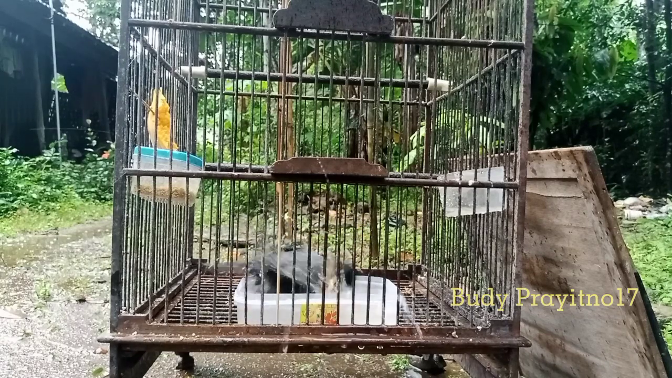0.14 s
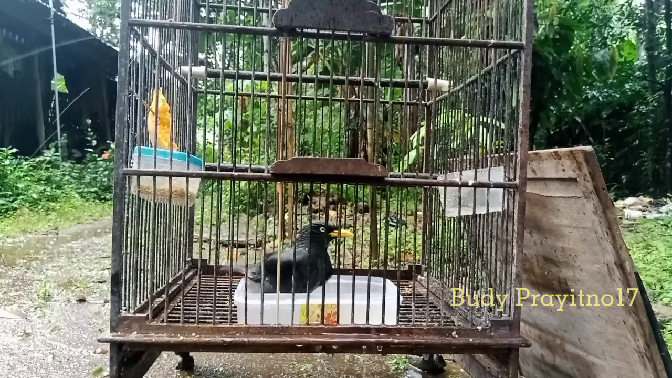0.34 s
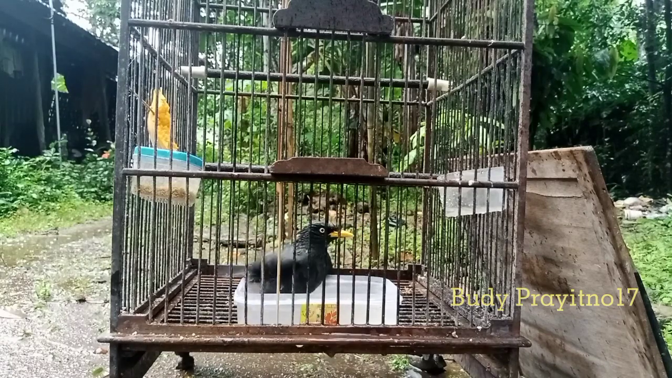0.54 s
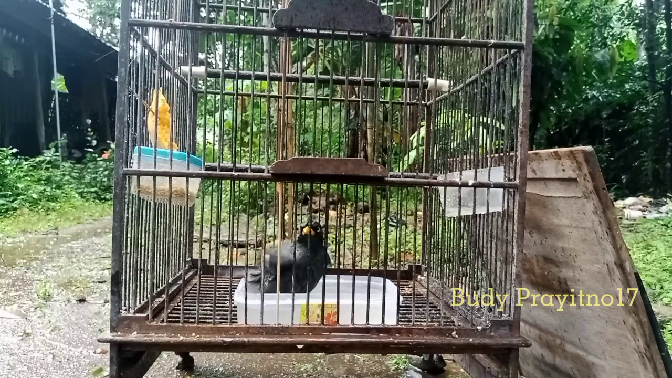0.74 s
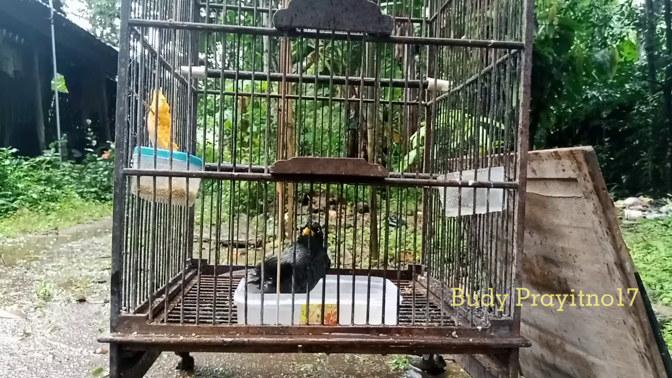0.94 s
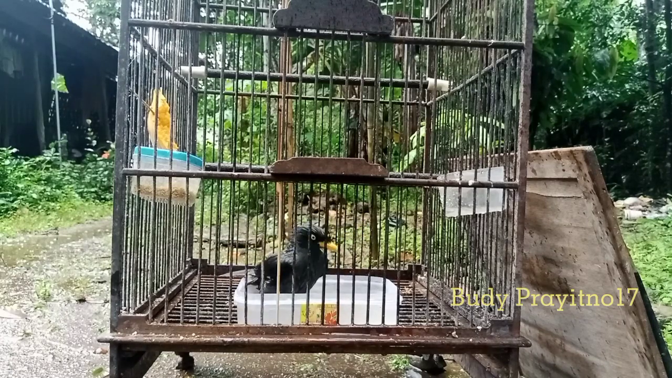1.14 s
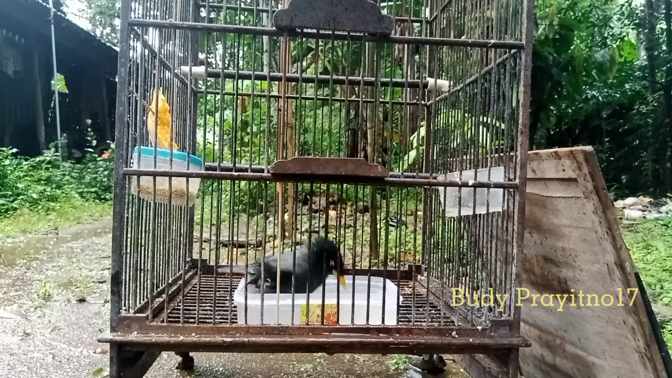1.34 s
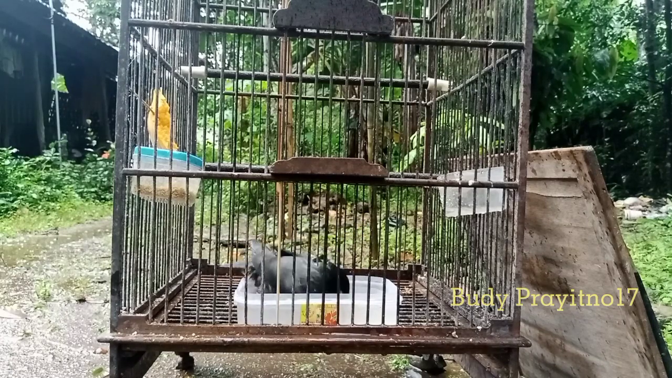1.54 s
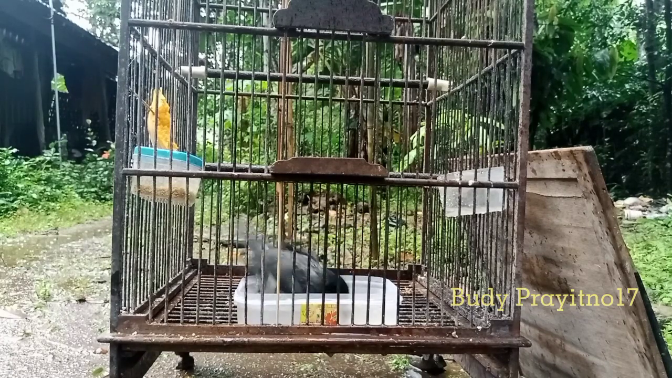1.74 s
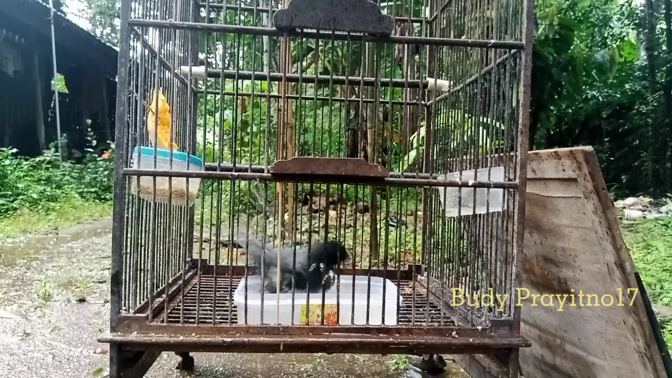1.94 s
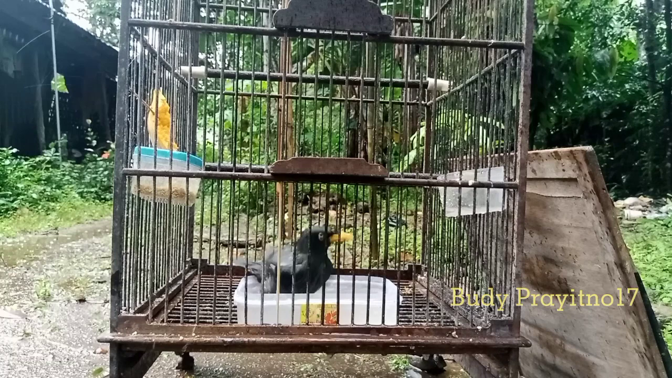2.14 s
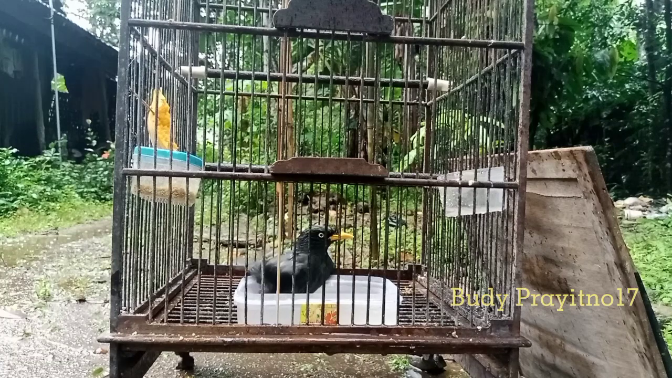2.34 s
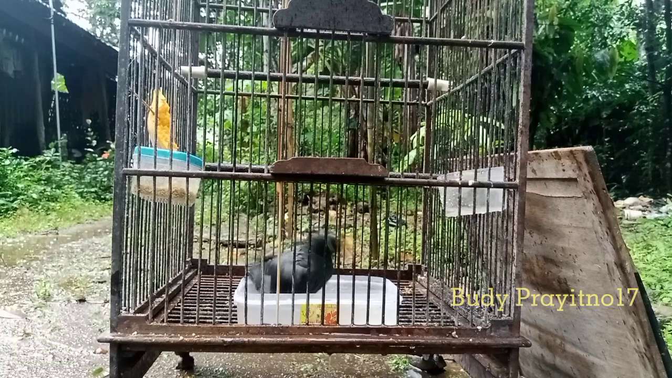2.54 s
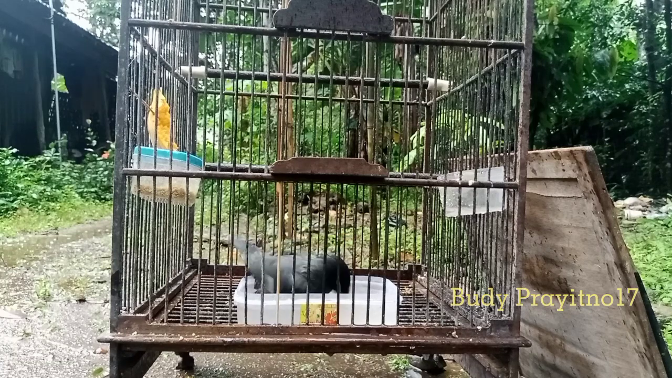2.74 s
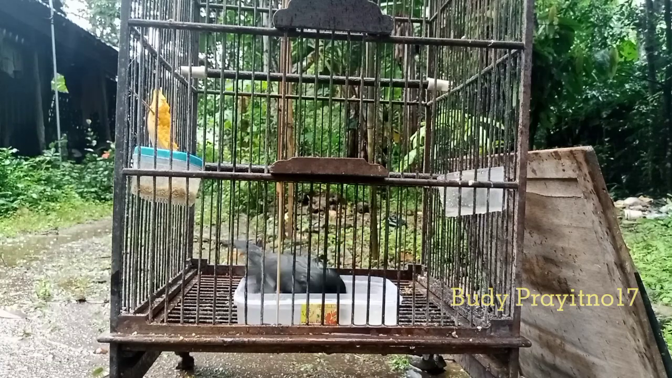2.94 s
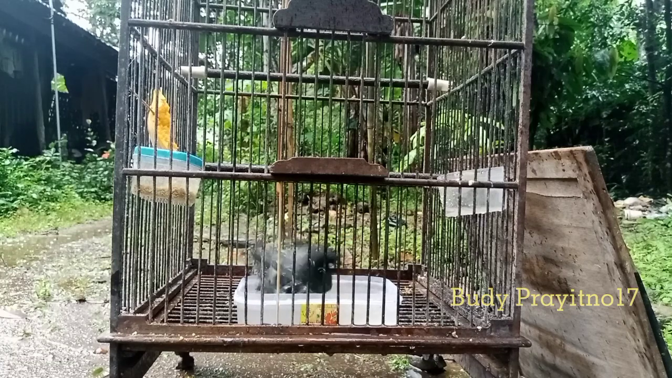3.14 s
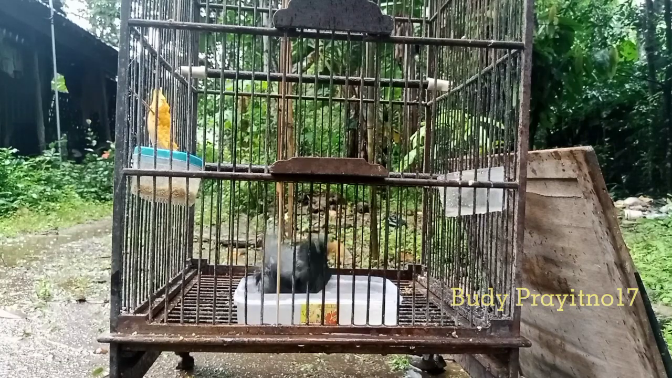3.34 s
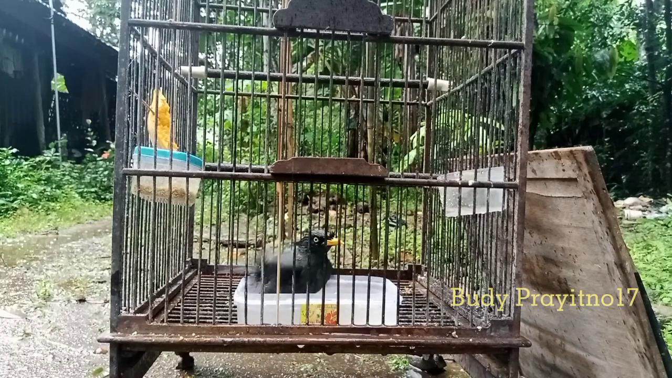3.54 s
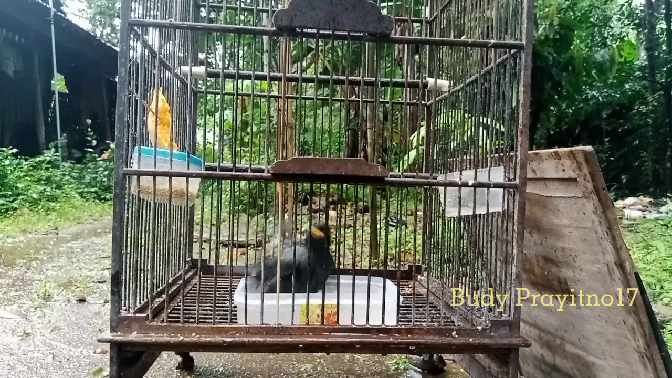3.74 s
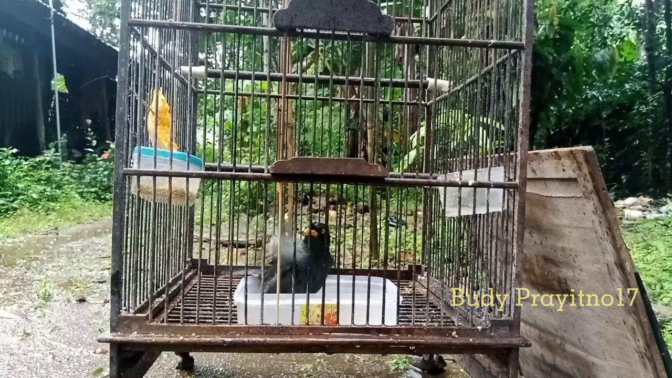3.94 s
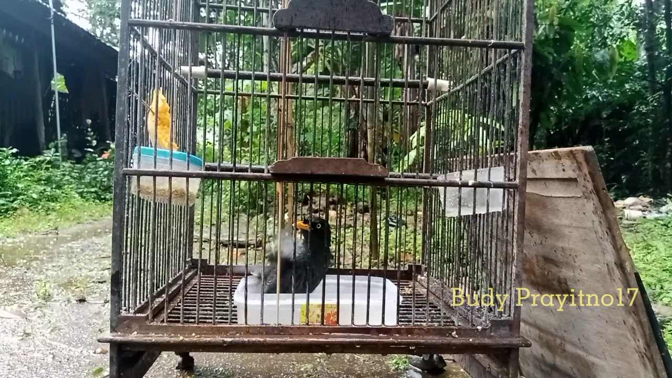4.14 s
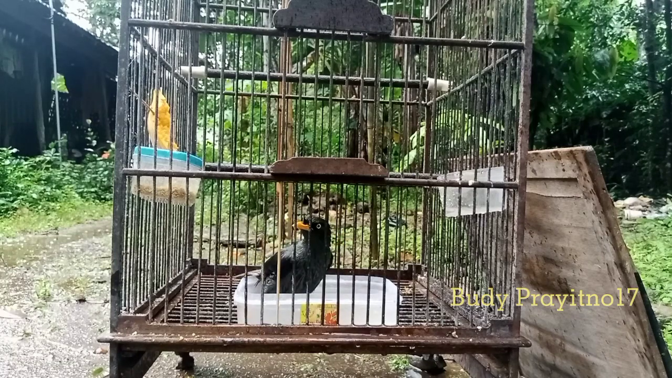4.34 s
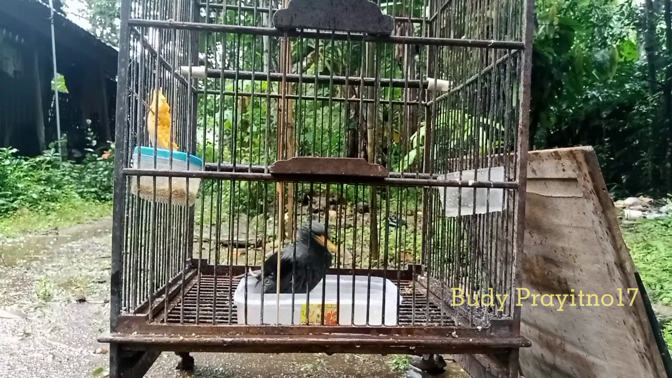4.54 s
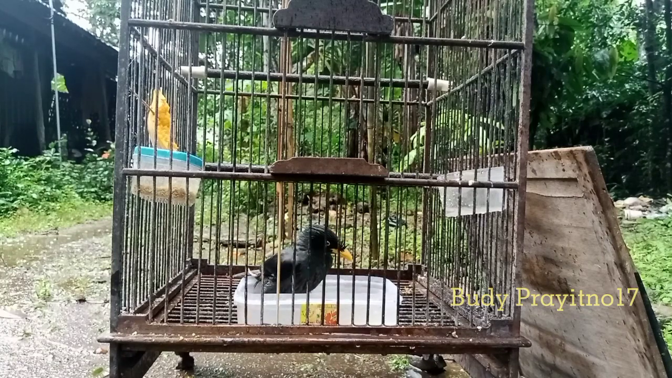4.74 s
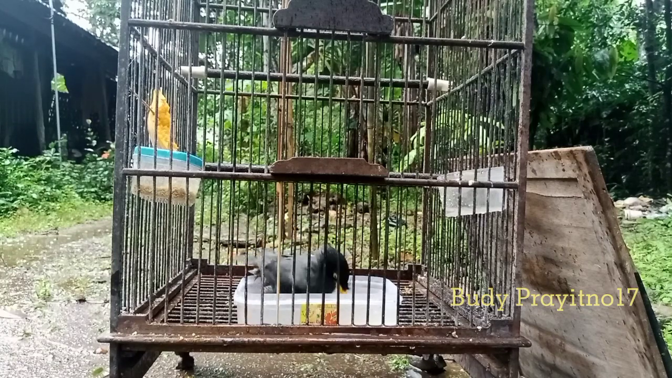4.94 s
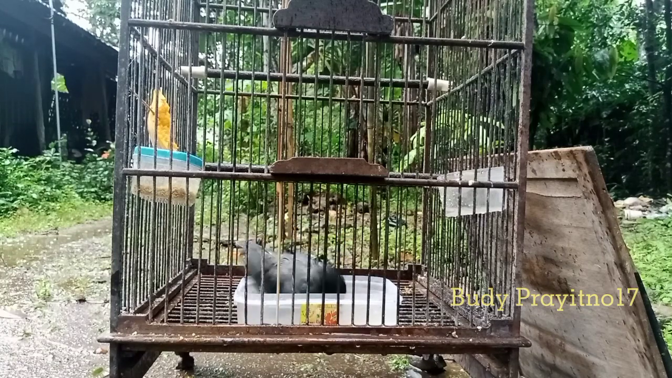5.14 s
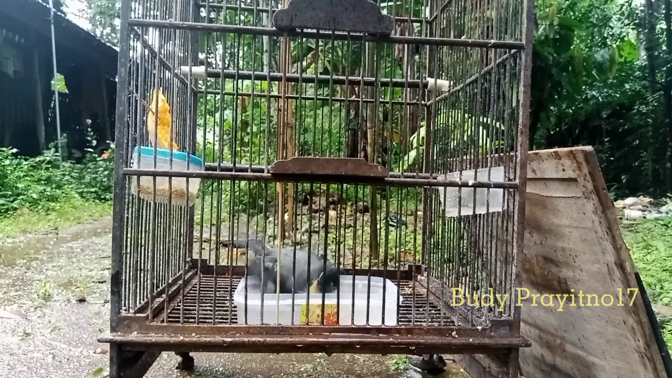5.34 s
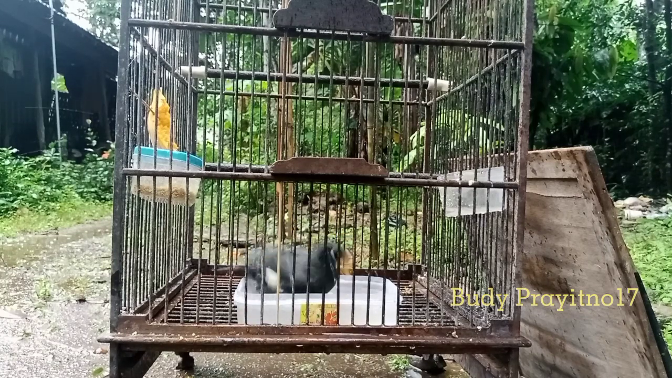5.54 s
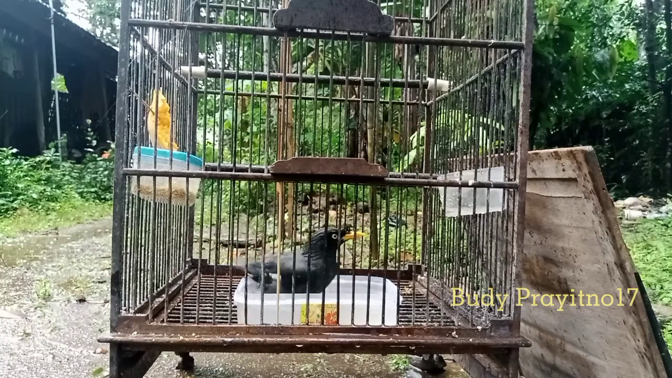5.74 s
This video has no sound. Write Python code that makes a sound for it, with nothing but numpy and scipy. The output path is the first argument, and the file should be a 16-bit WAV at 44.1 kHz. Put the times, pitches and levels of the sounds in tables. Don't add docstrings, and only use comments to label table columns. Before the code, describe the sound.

A rural back yard heard by a phone near a bird bathing in a shallow plastic tub. Hard, bright wing slaps crack at 0.2 and 0.3 s, with bubbly plips and fine spray. Light drops tick around 0.7 to 1.1 s; a sharp slap lands at 2.0 s and a thin snap at 2.2 s. A tight triple slap comes at 3.2 s, then wet feathers flutter about thirteen times a second from 3.65 to 4.2 s, strongest near the end. Stray drops lead to closing slaps at 5.5 to 5.6 s. Far away, a faint fowl calls early and near 3.1 s; a hoarse rooster crows from 3.5 to 5.1 s, loudest around 3.6 and 4.5 to 4.9 s, then come a cluck and short peeps. Cicadas swell and cut off every 1.5 s near 7 kHz above hissing leaves, gusty low roar and wavering engine hum.

```python
import sys
import numpy as np
from scipy import signal
from scipy.fft import rfft, irfft
from scipy.io import wavfile
from scipy.ndimage import uniform_filter1d

SR = 44100
rng = np.random.default_rng(int(sys.argv[2]) if len(sys.argv) > 2 else 0)


def natural_amplitude(level_db):
    exponent = np.asarray(level_db, float) / 20
    return 10 ** exponent


def to_wav(s):
    ch = np.atleast_2d(s).T
    pcm = np.round(np.clip(ch, -1, 1) * 32767)
    wavfile.write(sys.argv[1], SR, pcm.astype(np.int16))


N = 255339

# f/Hz, density/dB per Hz
CRACK_SPECTRUM = [(1760, -57), (3000, 7), (3480, 2.5), (5870, 18.5), (6960, 15), (8930, 17.5), (12900, 0.5),
                  (13500, 3), (15100, 8), (16500, -34)]


def level(x, db):
    return x * natural_amplitude(db) / np.sqrt(np.mean(x ** 2))


def peak(x, db):
    return x * natural_amplitude(db) / np.max(np.abs(x))


def colour(x, points):
    rows = np.array(points, float)
    hz = np.maximum(np.arange(2049) * SR / 4096, 1)
    gain_db = np.interp(np.log(hz), np.log(rows[:, 0]), rows[:, 1])
    cepstrum = irfft(np.log(natural_amplitude(gain_db)))
    cepstrum[1:2048] *= 2
    cepstrum[2049:] = 0
    impulse = irfft(np.exp(rfft(cepstrum)))
    return signal.fftconvolve(x, impulse)[:len(x)]


def band(x, hz, width_hz):
    return signal.lfilter(*signal.iirpeak(hz, hz / width_hz, fs=SR), x)


def walk(rate_hz):
    k = int(SR / rate_hz)
    held = np.repeat(rng.standard_normal(N // k + 1), k)[:N]
    return 1.16 * uniform_filter1d(uniform_filter1d(held, k), k)


def patches(shape, bins, frames):
    field = rng.standard_normal(shape)
    for axis, size in enumerate((bins, frames)):
        field = uniform_filter1d(uniform_filter1d(field, size, axis=axis), size, axis=axis)
    return field / np.std(field)


def add(track, sound, s):
    i = int(s * SR)
    track[i:i + len(sound)] += sound[:len(track) - i]


def hold(length_s, edge_s):
    return signal.windows.tukey(int(length_s * SR), min(2 * edge_s / length_s, 1))


def swells(table, edge_s):
    out = np.zeros(N)
    for s, length_s, db in table:
        add(out, db * hold(length_s, edge_s), s)
    return out


def distant(x):
    return signal.sosfilt(signal.ellip(8, .3, 50, 15550, fs=SR, output="sos"), x)


def leaves(size=1024):
    # f/Hz, density/dB per Hz
    hiss_spectrum = [(150, -22), (260, 0.5), (427, -6), (489, -4), (643, -5), (712, -3.5), (789, -7),
                     (1250, -9.5), (2310, -8), (2840, -8.5), (5920, -6), (7140, -13), (9070, -14.5),
                     (12300, -37), (15400, -26)]
    # f/Hz, share
    swell_share = [(300, .3), (1500, .8), (3000, 1.1), (6000, 1), (7500, 1.5), (9500, 1.5), (11000, .2),
                   (16000, .2)]
    # t/s, length/s, rise/dB
    bouts = [
        (.1, 0.31, 3.5),
        (.7, 0.18, 2),
        (1.92, 0.23, 2.5),
        (3.05, 0.81, 1),
        (3.75, 0.55, 1.5),
        (4.6, 0.3, 0.5),
        (5.2, 0.87, 2),
    ]
    overlap = size * 3 // 4
    hiss = colour(rng.standard_normal(N), hiss_spectrum)
    hz, _, spec = signal.stft(hiss, SR, nperseg=size, noverlap=overlap)
    gusts, flickers = patches(spec.shape, 40, 30), patches(spec.shape, 4, 8)
    share = np.interp(hz, *np.transpose(swell_share))[:, None]
    spec = spec * natural_amplitude(share * (0.63 * gusts + 2.7 * flickers))
    out = distant(signal.istft(spec, nperseg=size, noverlap=overlap)[1][:N])
    inside = signal.sosfilt(signal.butter(4, (1200, 5800), "band", fs=SR, output="sos"), out)
    return out / np.std(inside) * natural_amplitude(-49 + 1.5 + swells(bouts, 0.16))


def cicadas():
    song_db = [-41.5, -42.5, -43.5, -44.5, -39.5]
    # t/s, length/s, rise/dB
    answers = [
        (0, 0.25, 12.5),
        (.8, 1.62, 4),
        (3, 1.26, 9),
        (4.4, 1.5, 7),
    ]
    period_s, first_stop_s, length_s, rise_s, cut_s = 1.511, 0.62, 1.13, 1, 0.12
    t, near = np.arange(N) / SR, np.zeros(N)
    for k, db in enumerate(song_db):
        left_s = first_stop_s + k * period_s - t
        rise = np.clip((length_s - left_s) / rise_s + 0.45, 0, 1)
        near += natural_amplitude(db) * np.clip(left_s / cut_s, 0, 1) * rise
    far = natural_amplitude(-53 + swells(answers, 0.31))
    out = 0
    for hz, width_hz, gain in ((6662, 320, near), (6833, 360, far)):
        clicks = rng.standard_normal(N) * (rng.random(N) < .3) * natural_amplitude(0.15 * walk(90))
        ring = band(band(band(clicks, hz, width_hz), hz, 2.4 * width_hz), hz, 2 * width_hz)
        out = out + gain * level(ring, 0)
    return out


def voice(hz, orders, rough, wobble):
    phase = 2 * np.pi * np.cumsum(hz * (1 + wobble - np.mean(wobble))) / SR
    flicker = 1 + rough - np.mean(rough)
    harmonics = sum(natural_amplitude(db) * np.sin(k * phase) for k, db in orders)
    return np.sqrt(2 / np.mean(flicker ** 2)) * flicker * harmonics


def fowl():
    # t/s, length/s, first f/Hz, last f/Hz, level/dB
    crow = [
        (3.463, 0.13, 784, 688, -54.5),
        (3.598, 0.072, 713.4, 704, -39.5),
        (3.653, 0.109, 721, 692, -53),
        (4.105, .2, 689, 702, -45.5),
        (4.413, 0.12, 698, 766, -45.5),
        (4.493, 0.097, 751, 685, -38),
        (4.602, 0.116, 665, 767, -44),
        (4.71, .19, 706, 694, -39),
        (4.889, 0.12, 694, 657, -44.5),
        (5.088, 0.081, 694, 670, -53.5),
    ]
    # t/s, length/s, f/Hz, level/dB
    far_cock = [
        (0, .1, 830, -53),
        (.05, .16, 860, -54),
        (.2, .12, 840, -56),
        (2.97, .1, 445, -57),
        (3.04, .09, 880, -53),
        (3.095, .1, 888, -44.5),
        (3.18, .12, 870, -53),
        (3.25, .15, 830, -53),
    ]
    # t/s, length/s, f/Hz, level/dB
    clucks = [
        (5.222, .05, 514, -40),
    ]
    # t/s, length/s, f/Hz, level/dB
    cluck_tail = [
        (5.245, .13, 509, -48.5),
    ]
    # t/s, length/s, f/Hz, level/dB
    peeps = [
        (.14, .14, 505, -52),
        (4.5, .05, 830, -52),
        (4.705, .055, 868, -43),
        (4.87, .12, 615, -43),
        (5.21, .03, 860, -48),
        (5.27, .12, 1320, -55),
        (5.4, .12, 1320, -57),
        (5.3, .1, 1010, -54),
        (5.388, .032, 855, -36),
    ]
    # multiple, level/dB
    crow_orders = [(1, 1), (2, -25.5), (3, -24.5)]
    far_orders = [(1, -15), (2, 0), (3, -10)]
    cluck_orders = [(1, 0), (2, 0), (3, -20), (4, -13), (5, -10)]
    tail_orders = [(1, 0), (2, -5), (3, -20), (4, 1), (5, -14), (7, 0)]
    out, rough, wobble = np.zeros(N), .7 * walk(70), .032 * walk(70)
    for s, length_s, first_hz, last_hz, db in crow:
        shape = hold(length_s, 0.018)
        at = slice(int(s * SR), int(s * SR) + len(shape))
        glide_hz = np.linspace(first_hz, last_hz, len(shape))
        add(out, natural_amplitude(db - 1.0) * shape * voice(glide_hz, crow_orders, rough[at], wobble[at]), s)
    callers = ((far_cock, far_orders), (clucks, cluck_orders), (cluck_tail, tail_orders),
               (peeps, [(0.98, 0.0048)]))
    for table, orders in callers:
        for s, length_s, hz, db in table:
            i, j = int(s * SR), int((s + length_s) * SR)
            swell = np.sin(np.pi * np.linspace(0, 1, j - i) ** .7)
            add(out, natural_amplitude(db) * swell * voice(hz, orders, rough[i:j], 0.76 * wobble[i:j]), s)
    t, t60_s, wet_db = np.arange(SR // 2) / SR, .14, -9
    echo = rng.standard_normal(len(t)) * natural_amplitude(-60 * t / t60_s) * (t > .012)
    return out + natural_amplitude(wet_db) * signal.fftconvolve(out, echo / np.sqrt(np.sum(echo ** 2)))[:N]


def rumble():
    # f/Hz, density/dB per Hz
    roar_spectrum = [(12, -27), (20, -9), (32, -34), (74, 1), (146, -0.5), (198, -3.5), (262, -15),
                     (347, -26), (420, -31), (550, -42), (920, -120)]
    # t/s, length/s, rise/dB
    surges = [(.03, 0.17, 10), (.23, 0.16, 9.5), (.38, 0.39, 7), (.73, 0.13, 9), (.88, .14, 10.5),
              (1.1, 0.23, 7), (1.32, 0.15, 9.5), (1.55, 0.23, 5), (1.84, 0.16, 5.5), (2.1, 0.14, 6.5),
              (2.24, 0.11, 7.5), (2.67, 0.13, 5), (2.96, 0.17, 4.5), (3.17, 0.53, 4), (3.84, 0.12, 8),
              (4.0, .19, 8), (4.38, .18, 0), (4.61, 0.13, 8), (4.75, 0.098, 8.5), (5.0, .12, 7),
              (5.28, 0.13, 6.5), (5.48, .4, 8.5)]
    # t/s, length/s, f/Hz, level/dB
    hum = [(.03, 0.14, 149, -34), (.25, 0.67, 154.6, -36.5), (1.08, 0.5, 194, -38),
           (1.052, 0.31, 241.6, -43), (1.454, .1, 245.5, -49), (1.32, 0.21, 151, -70),
           (1.6, 0.68, 155, -43.5), (1.75, 0.31, 189.8, -43.5), (2.58, 0.12, 174, -43),
           (3.5, 0.19, 156, -42), (4.08, 0.14, 162.6, -38), (4.2, 0.57, 205.2, -44.5),
           (4.62, 0.2, 141.8, -38.5), (5.02, 0.088, 159.5, -42), (5.28, 0.12, 182, -37),
           (5.45, 0.31, 159.3, -42)]
    roar = level(colour(rng.standard_normal(N), roar_spectrum) * natural_amplitude(1.0 * walk(14)), -42.5)
    core = 0.76 * band(roar, 117, 140)
    roar = roar - core + core * natural_amplitude(-3.0 + 1.284 * swells(surges, 0.046))
    rough, wobble = .8 * walk(16), .024 * walk(14)
    for s, length_s, hz, db in hum:
        shape = hold(length_s, 0.095)[:N - int(s * SR)]
        at = slice(int(s * SR), int(s * SR) + len(shape))
        add(roar, shape * voice(hz, [(0.98, db - 3.5)], rough[at], wobble[at]), s)
    return roar


def burst(t, rise_s, fall_s):
    return (1 - np.exp(-t / rise_s)) * np.exp(-t / fall_s)


def drops(table, rise_share, crack_db=1.5, trail=0.067, size=2048):
    # f/Hz, density/dB per Hz
    dull_spectrum = [(1200, -50), (2400, 3), (3000, 2.5), (4500, 7), (6000, 5), (8000, -26)]
    t, out = np.arange(size) / SR, np.zeros(N)
    noise = rng.standard_normal((len(table), 2, size))
    for (s, db, hz, dull_db, ms), (hiss, thud) in zip(table, noise):
        fall_s = max(ms, .3) / 1000
        shape = burst(t, rise_share * fall_s, fall_s)
        shape = shape + trail * burst(t, .001, 0.017)
        shape = shape * natural_amplitude(16.0 * uniform_filter1d(thud, size=40))
        crack = colour(hiss * shape, CRACK_SPECTRUM)
        ring = band(band(band(hiss * shape, hz, 1300), hz, 1900), hz, 2800)
        tick = peak(crack, crack_db) + peak(ring, -8.5)
        body = peak(colour(thud * shape, dull_spectrum), db + dull_db - 4.0)
        add(out, peak(tick, db) + body, s + .0004)
    return out


def bubble(age_s, hz, life_s, glide=0.0096):
    age_s = np.maximum(age_s, 0)
    ring = np.sin(2 * np.pi * hz * age_s * (1 + glide * age_s / life_s))
    return (1 - np.exp(-age_s / 0.000097)) * np.exp(-age_s / life_s) * ring


def plinks(table, size=4096):
    t, out = np.arange(size) / SR, np.zeros(N)
    for s, db, hz, ms in table:
        base_hz = min(hz, 7000)
        ring = band(band(bubble(t, hz, ms / 1000), hz, .6 * base_hz), hz, .8 * base_hz)
        add(out, natural_amplitude(db + 2.5) * ring, s)
    return out


def slaps(size=4096):
    # t/s, peak/dB, large bubble f/Hz, small bubble f/Hz, crack share/dB
    hits = [(0.1914, -6.5, 1730, 2930, -7), (0.2855, -13, 1550, 2740, 9.5), (2.0283, -10, 1990, 2500, 2.5),
            (3.2423, -16.5, 1780, 2720, 5), (3.2491, -24, 1770, 2540, 4), (3.2563, -24, 1570, 2730, -10),
            (5.477, -21, 2050, 1990, 1.5), (5.487, -24.5, 1950, 2570, -5), (5.5008, -22, 2094, 2200, -8),
            (5.5771, -9.5, 1347, 2540, -7), (5.599, -16, 1640, 2330, -2)]
    # t/s, peak/dB
    rocks = [
        (.205, -36),
        (.29, -42),
        (2.031, -29.5),
        (3.245, -32.5),
        (5.582, -25),
        (5.603, -34),
    ]
    # f/Hz, density/dB per Hz
    froth_spectrum = [(300, -21), (700, -50), (1300, 0), (2200, 18), (3000, 6.5), (3500, 10), (4400, 13),
                      (6000, -0.5), (8000, -26)]
    spray_spectrum = [(210, 4), (350, -33), (1190, -11), (2850, 11), (3740, -0.5), (6800, 2.5), (8120, 0),
                      (13600, -25), (15200, -22), (16500, -129)]
    slosh_spectrum = [(250, -11), (450, -2), (800, 0), (1300, -6.5), (2000, 0), (3500, -66)]
    t, out, tau_s = np.arange(size) / SR, np.zeros(N), 1.18 / 1000
    noise = rng.standard_normal((len(hits), 3, size))
    for (s, db, low_hz, high_hz, crack_db), (hiss, churn, mist) in zip(hits, noise):
        snap = burst(t, 0.000078, 0.065 * tau_s) + 0.16 * np.exp(-t / (2.13 * tau_s))
        crack = colour(hiss * snap, CRACK_SPECTRUM)
        large = band(bubble(t, low_hz, 1.8 * tau_s), low_hz, 1000)
        small = band(bubble(t - .0004, high_hz, 1.47 * tau_s), high_hz, 1600)
        pair = natural_amplitude(-6.5) * large + small
        froth = colour(churn * burst(t, 0.00096, 3.34 * tau_s), froth_spectrum)
        spray = colour(mist * burst(t, 0.0024, 0.034), spray_spectrum)
        splash = peak(crack, db + crack_db) + peak(pair, db - 2.5)
        splash = splash + peak(froth, db - 6.0) + peak(spray, db - 18.0)
        add(out, splash, s + 0.00052)
    for k, (s, db) in enumerate(rocks):
        slosh = colour(noise[k, 1, ::-1] * burst(t, 0.0049, 0.017), slosh_spectrum)
        add(out, peak(slosh, db), s)
    return out


def shakes():
    beats = [
        (3.6528, -37, -34),
        (3.729, -28.5, -42),
        (3.8074, -27, -34),
        (3.884, -26, -31),
        (3.957, -26.5, -39),
        (4.033, -22.5, -35),
        (4.109, -21, -30),
        (4.1896, -34.5, -35.5),
    ]
    lead_s, crisp_ms, soft_ms = 0.0175, 3.3, 6.7
    strokes = [(s, db) for s, db, _ in beats] + [(s - lead_s, db) for s, _, db in beats]
    table = [(s, db, 8850, 2.5, soft_ms if db < -30 else crisp_ms) for s, db in strokes]
    return drops(table, 0.26, crack_db=5.0, trail=0.22)


def bath():
    # t/s, peak/dB, ring f/Hz, dull share/dB
    flung = [(0.057, -52, 8720, -18), (0.1044, -35, 8600, -3), (0.1144, -36, 8280, -7),
             (0.2359, -23, 8540, -4), (0.709, -33.5, 7950, 5), (0.732, -31, 8450, 3), (0.799, -33, 8550, 0),
             (0.819, -34.5, 9000, 9.5), (1.056, -35, 8900, 11), (1.976, -31, 9500, -10),
             (2.2414, -34, 8600, 1), (2.7333, -33.5, 7800, 4), (2.829, -38, 8170, -13),
             (3.322, -26.5, 9050, -1), (4.785, -34, 8500, 4), (5.131, -33.5, 8460, -28)]
    # t/s, peak/dB, ring f/Hz, dull share/dB
    rings = [
        (0.146, -23.5, 7730, -14),
        (1.867, -33, 8460, -17),
        (1.967, -26, 8950, 2),
        (1.9963, -30, 8500, -23),
        (5.5605, -20.5, 6740, -21),
        (5.6441, -25, 7410, -25),
        (5.778, -28.5, 7800, -26),
        (3.143, -37.5, 9500, -20),
        (3.5567, -31.5, 8700, -7),
    ]
    # t/s, peak/dB, ring f/Hz, dull share/dB, length/ms
    mists = [
        (.2445, -26.5, 8900, -1, 3),
        (.2675, -36, 14800, -15, 2),
        (.2856, -15, 10900, -25, 0.92),
        (3.2425, -33, 11200, -11, 1.8),
        (1.9405, -34, 9500, -10, 5),
        (2.0215, -23, 8750, -7, 1.3),
        (2.1794, -21, 8100, -28, 0.8),
        (5.468, -34, 9600, 7, 12),
        (5.657, -32, 9500, -19, 2.1),
    ]
    # t/s, peak/dB, f/Hz, life/ms
    bubbles = [(.113, -38, 3650, 9), (.1921, -14, 6900, .7), (.1936, -12, 3200, 1.3),
               (.1922, -15, 1900, 1.5), (.1965, -21, 1500, 4), (.2862, -12, 2650, 1.2),
               (3.196, -31, 4180, 5), (3.4335, -17, 7800, .6), (2.1802, -10, 7900, .6),
               (2.1802, -20, 9600, .5), (2.031, -27, 1250, 4), (2.0295, -17, 2300, 1.5),
               (1.7248, -23, 6800, 1.2), (.2861, -9, 8600, .45), (.2862, -27, 15000, 1),
               (3.8092, -24, 8600, .5), (3.8094, -26, 4100, .8), (3.8826, -24, 6600, .8),
               (3.9598, -26, 5200, .7), (3.96, -27, 8800, .6), (4.1102, -22, 4360, .7),
               (3.652, -38, 1980, 5), (5.3965, -38, 2400, 2), (5.4765, -29, 5800, 1),
               (5.5785, -24, 6700, 1.2), (5.6, -26, 4400, 1.5), (5.6, -27, 6600, 1),
               (3.2428, -20, 2680, 2.5), (.233, -31, 3200, 2), (.258, -33, 1600, 2), (3.187, -38, 2650, 6),
               (5.5785, -20, 4300, 2), (5.4765, -27, 4400, 2)]
    # t/s, peak/dB, f/Hz, life/ms
    tops = [
        (.2862, -36, 15900, .8),
        (2.0292, -43, 15900, .6),
        (2.1802, -44, 15900, .6),
        (3.2428, -32, 15300, 1),
        (3.2428, -28, 12600, .9),
        (5.5785, -40, 16000, .6),
    ]
    drop_ms = 1.45
    water = slaps() + plinks(bubbles) + shakes() + drops(mists, 0.41)
    water = water + drops([(*row, drop_ms) for row in flung], 0.27)
    water = water + drops([(*row, drop_ms) for row in rings], .2, crack_db=-25)
    return plinks(tops) + distant(water)


def trills():
    # t/s, length/s, f/Hz, level/dB
    spells = [
        (0.75, 0.5, 4180, -50.5),
        (0.34, 0.56, 2990, -54.5),
        (4.85, 0.13, 5100, -66),
        (.9, .35, 2750, -57.5),
    ]
    out, clicks = np.zeros(N), rng.standard_normal(SR) * (rng.random(SR) < .3)
    for s, length_s, hz, db in spells:
        shape = hold(length_s, 0.067)
        ring = level(band(band(clicks, hz, 500), hz, 900), db)
        add(out, shape * ring[:len(shape)], s)
    return out


def scene():
    mono = leaves() + cicadas() + fowl() + rumble() + bath() + trills()
    return np.array([mono, mono])


def suppress(x, strength=0.48, least_db=-2.5, size=1024, count=3):
    overlap = size * 3 // 4
    spec = signal.stft(x, nperseg=size, noverlap=overlap)[2]
    power = uniform_filter1d(np.abs(spec) ** 2, count, axis=1) + 1e-18
    floor = np.median(power, axis=1, keepdims=True)
    gain = np.sqrt(np.maximum(1 - strength * floor / power, natural_amplitude(2 * least_db)))
    return signal.istft(spec * gain, nperseg=size, noverlap=overlap)[1][:len(x)]


def band_limit(x):
    return signal.sosfilt(signal.butter(12, 16810, fs=SR, output="sos"), x)


def record(dry):
    heard = signal.sosfilt(signal.ellip(8, .3, 70, 16700, fs=SR, output="sos"), dry[0])
    clean = suppress(heard)
    return band_limit(np.array([clean, clean]))


dry = scene()
out = record(dry)
to_wav(out)
```